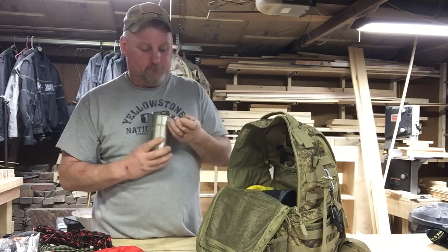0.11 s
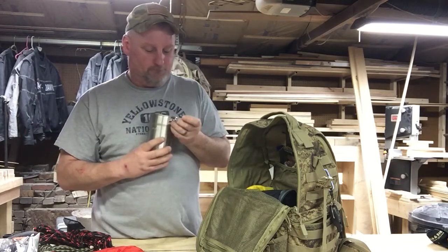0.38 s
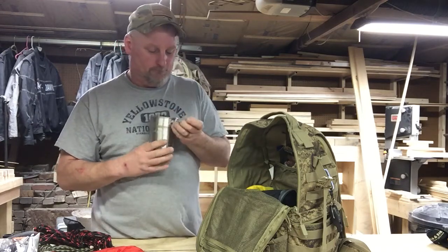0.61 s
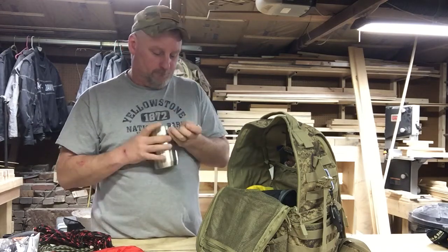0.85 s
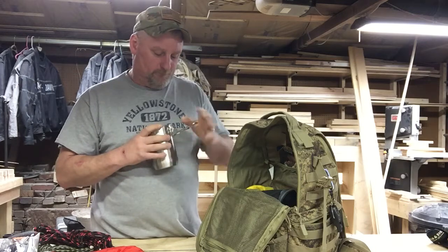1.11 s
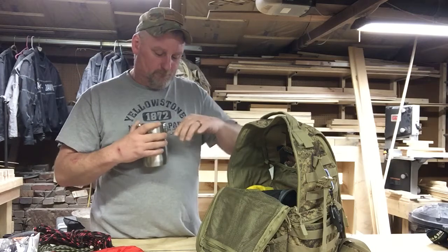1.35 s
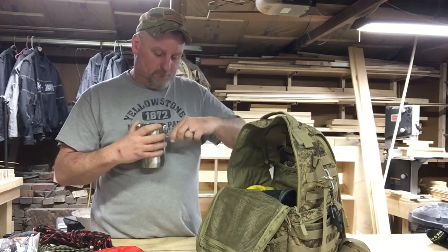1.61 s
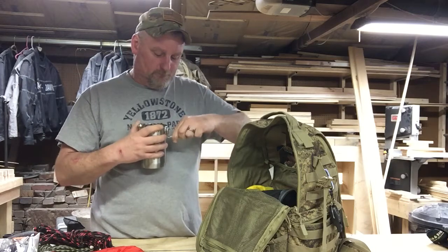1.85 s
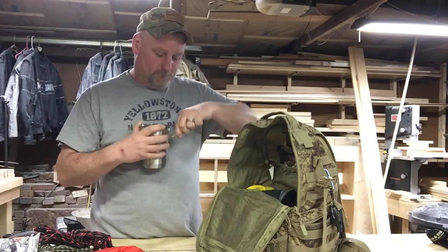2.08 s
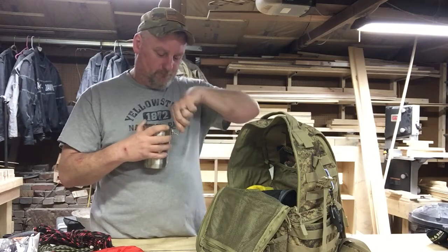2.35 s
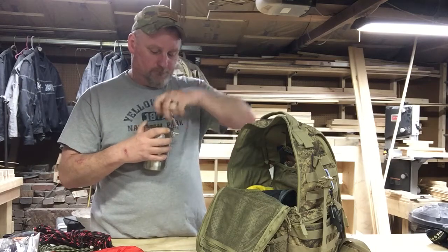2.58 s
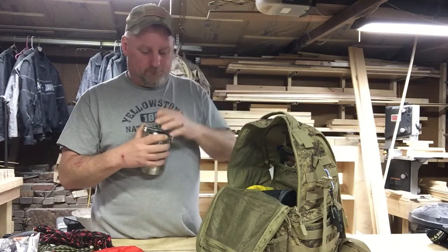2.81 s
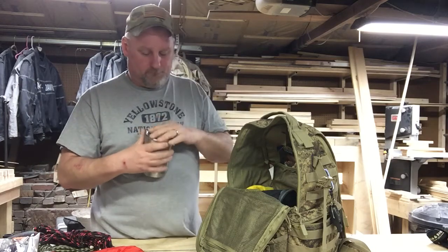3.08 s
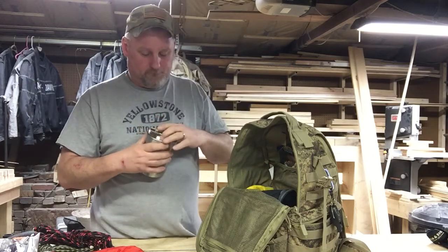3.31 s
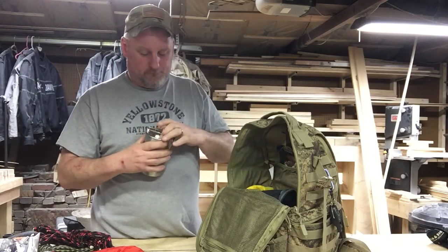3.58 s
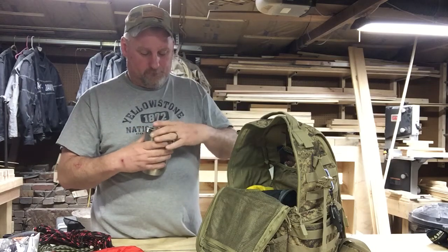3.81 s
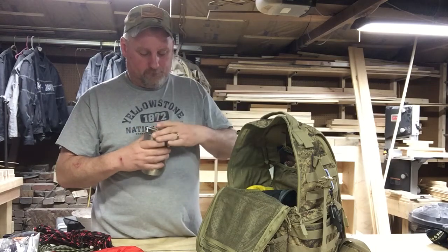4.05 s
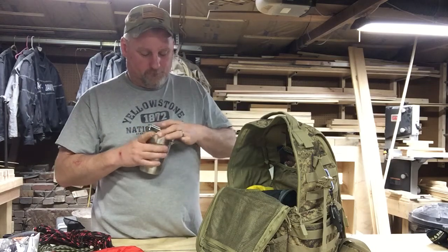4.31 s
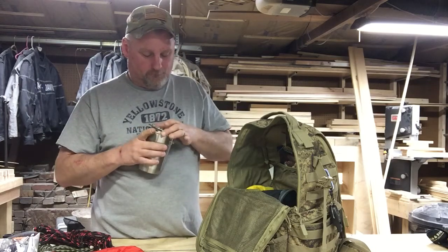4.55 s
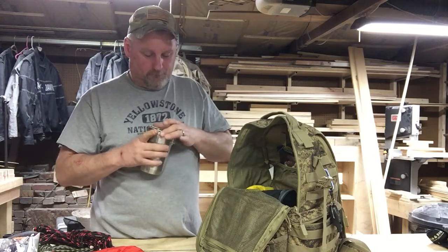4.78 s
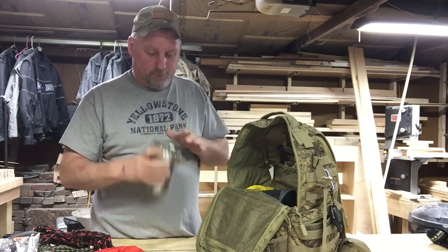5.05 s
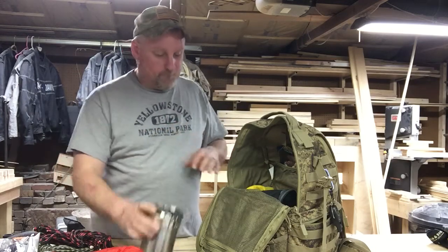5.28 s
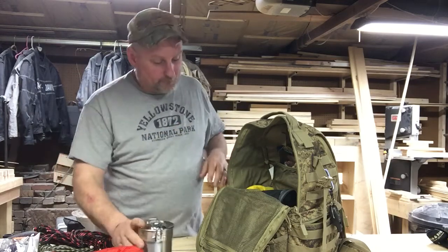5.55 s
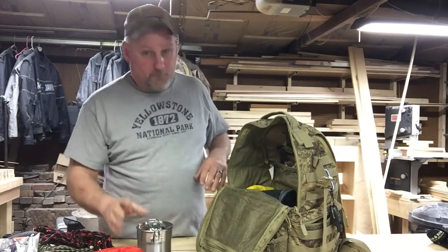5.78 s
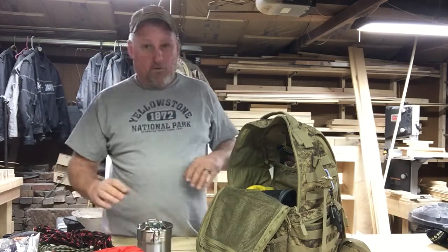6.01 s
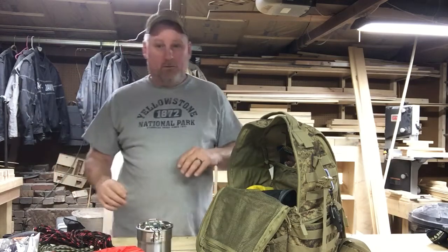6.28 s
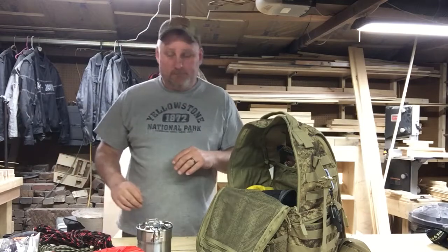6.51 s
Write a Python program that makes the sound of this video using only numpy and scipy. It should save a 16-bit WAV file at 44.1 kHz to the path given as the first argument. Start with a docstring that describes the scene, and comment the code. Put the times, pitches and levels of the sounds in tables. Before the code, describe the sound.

Thin steel cups click and scrape as they nest together, snap home loudly, then clank onto a wooden table over faint machine hum.

```python
"""A machine hums steadily nearby in a small workshop, in still room noise, and faint steel clicks begin.
Hands fit thin steel cups into one another: damped modes click, grainy noise scrapes, one snap drives out air.
The stack is then set on a wooden table, whose modes thud late in the bass; it rocks and bounces a few
times and rattles. Rubbed walls sing softly on single modes. Near echoes and a short tail place the hits
in the room. At the microphone the two hardest hits clip and deep bass is lost."""
import sys
import numpy as np
from scipy import signal
from scipy.fft import rfft, irfft
from scipy.io import wavfile
from scipy.ndimage import uniform_filter1d

SR = 44100
rng = np.random.default_rng(int(sys.argv[2]) if len(sys.argv) > 2 else 0)


def amplitude_ratio(level_db):
    """Convert a level in decibels to the matching linear amplitude (field) ratio."""
    exponent = np.asarray(level_db, float) / 20
    return 10 ** exponent


def to_wav(s):
    """Save 16-bit WAV."""
    ch = np.atleast_2d(s).T  # columns
    pcm = np.round(np.clip(ch, -1, 1) * 32767)  # PCM
    wavfile.write(sys.argv[1], SR, pcm.astype(np.int16))


N = 292790


def evened(x):
    """Scales to rms 1."""
    return x / np.sqrt(np.mean(x ** 2) + 1e-20)


def read(points, hz):
    """Reads a table along log frequency."""
    f, value = np.transpose(points)
    return np.interp(np.log(hz + 1), np.log(f + 1), value)


def add(mix, start_s, sound):
    """Mixes a sound in at start_s seconds."""
    part = mix[round(start_s * SR):][:len(sound)]
    part += sound[:len(part)]


def ring(modes, more_db=0, free=1, rise_s=0.00059, phase=0, seconds=.25):
    """Answer of a set of modes to one tap, peak 1; each swells over rise_s, and free scales its t60."""
    hz, db, t60 = np.transpose(modes)[:, :, None]
    t = np.arange(round(seconds * SR)) / SR
    swell = 1 - np.exp(-(t / rise_s) ** 2)
    decay = amplitude_ratio(db + more_db - 60 * t / np.maximum(free * t60, .003))
    x = (decay * swell * np.sin(2 * np.pi * hz * t + phase)).sum(0)
    return x / abs(x).max()


# wall modes too close to tell apart: (frequency [Hz], relative level [dB])
DENSE = [(300, -30), (700, -22), (1200, 2.5), (3500, 2), (7500, -4.5), (10000, -8.5), (11500, -5),
         (14000, -13), (16500, -8.5)]


def coloured(x, more_db=lambda hz: 0):
    """Gives noise the colour of the dense wall modes."""
    hz = np.fft.rfftfreq(len(x), 1 / SR) + 1
    return irfft(rfft(x) * amplitude_ratio(read(DENSE, hz) + more_db(hz)), len(x))


# wall of the hand-held stack: (frequency [Hz], relative level [dB], t60 before any further damping [s])
STEEL = [(840, -18, 0.012), (1064, -4, 0.021), (1280, 1, 0.018), (1473, -1, 0.031), (1790, -10, 0.036),
         (2130, -7, 0.03), (2800, -2, 0.017), (3140, 0.5, 0.023), (3580, -4, 0.027), (3870, -4.5, 0.013),
         (4426, -9.5, 0.047), (4510, -9, 0.011), (5230, -1.5, 0.0052), (5500, -7.5, 0.022),
         (6580, -7, 0.017), (7260, -11, 0.035), (8020, -11, 0.0074), (11400, -19.5, 0.025),
         (13700, -15, 0.015), (14400, -17.5, 0.038)]
# rim of an inner cup that no finger touches: (frequency [Hz], relative level [dB], t60 when free [s])
RIM = [(1650, -16.5, 0.07), (3155, 3.5, 0.036), (5840, -4, 0.064), (7530, -6.5, 0.062), (7825, -8, 0.028),
       (8900, -12, 0.03), (11270, -9.5, 0.05)]


def click(peak_db, best_hz, tilt_db, rim_db):
    """A contact rings wall and rim; modes near the place of contact sound louder."""
    grip_shift = .035  # each grip detunes the wall modes by about this share
    chatter = 3  # the contact's chatter dies away over this many rise times

    def tilt(hz):
        blunt = 0.51 * min(tilt_db, 0)  # blunt contacts lose the top faster
        return tilt_db * np.log2(hz / 3000) + blunt * np.maximum(np.log2(hz / 6500), 0)

    def place_db(hz):
        return tilt(hz) + 8 * np.exp(-(np.log2(hz / best_hz) / 0.2) ** 2)

    rise_s = 0.00039 * amplitude_ratio(-.36 * peak_db)  # gentle contacts are slower
    noise = rng.standard_normal(4096)
    chance = noise[:, None]  # the same draws also vary the grip and the phases
    t = np.arange(len(noise)) / SR
    wall = np.vstack([STEEL, [best_hz, -6, .022]])  # the spot that is touched adds its own note
    wall[:-1, :1] *= 1 + grip_shift * chance[100:100 + len(STEEL)]
    grip_db = np.vstack([3.5 * chance[:len(STEEL)], 0])
    phase = np.pi * chance[-len(wall):]
    steel = ring(wall, place_db(wall[:, :1]) + grip_db, 0.6, rise_s, phase)

    burst = evened(coloured(noise, place_db)) * amplitude_ratio(-60 * t / 0.025)
    steel[:len(t)] += 0.66 * burst * np.minimum(t / rise_s, 1)
    bounces = (abs(noise) > 2.5) * .6 * np.exp(-t / (chatter * rise_s))
    steel = signal.fftconvolve(steel, np.r_[1, bounces])[:len(steel)]
    steel /= abs(steel).max()
    steel = signal.lfilter(*signal.butter(2, 500, "high", fs=SR), steel)  # the clicks carry little below 500 Hz

    # a rim that is not quite round splits each mode
    pairs = np.vstack([RIM, np.multiply(RIM, [1.012, 1, .6]) - [0, 6., 0]])
    free = min(amplitude_ratio(.5 * (rim_db - 8.5)), 1)  # a rim that sounds freely also rings longer
    phase = np.pi * chance[-len(pairs):]
    steel += amplitude_ratio(rim_db) * ring(pairs, tilt(pairs[:, :1]), free, rise_s, phase)
    return steel * amplitude_ratio(peak_db) / abs(steel).max()


# steel against steel, before the room: (time [s], peak [dB], best-excited part of the wall [Hz],
# tilt [dB per octave], free rim relative to the wall [dB])
CLICKS = [(0.041, -53.5, 1330, -12, -16), (0.088, -53, 1110, 6, -11), (0.163, -42.5, 1070, 6.5, -4),
          (0.842, -34.5, 4380, -3.5, -25), (0.884, -50, 2380, -2, -12), (1.066, -45, 3040, 0, -20),
          (1.311, -24, 3230, -1.5, 1.5), (1.3454, -46, 1150, -3, -4), (1.3646, -42.5, 3080, -2.5, -20),
          (1.319, -36, 5840, 4, 6), (1.7856, -36, 2800, -4.5, -18), (1.7994, -48.5, 2170, -3, -11),
          (1.951, -49, 1145, -5.5, -5.5), (2.501, -41, 3820, -1, -24), (2.782, -43.5, 3330, -1.5, -14),
          (2.796, -36, 3000, -1.5, -12), (2.805, -3, 5444, 0.8, -20), (2.9522, -49, 1660, -9, -23),
          (3.1741, -31, 2840, 1.5, -10), (3.2848, -42.5, 3000, -1.5, -22), (3.7508, -45.5, 1310, -9, -3.5),
          (3.769, -49.5, 2195, -6, -9), (4.2944, -28, 1606, 4.5, -5.5), (4.3171, -30.5, 2980, 1.5, -9.5),
          (4.71, -32, 5200, 4, -30), (4.806, -33.5, 1350, 5, -15), (4.8766, -39, 4870, -2.5, -27),
          (4.995, -38.5, 3260, 2, -18), (5.0288, -39.5, 1870, -5.5, -8), (5.0624, -42.5, 1120, -4.5, -15),
          (5.1046, -45, 7360, 2.5, -8.5), (5.418, -3, 1050, -0.5, -12), (5.5583, -25.5, 1020, -9, -21),
          (5.6427, -32, 1090, -1, -10), (5.7596, -49, 2166, 2, -5), (6.1649, -45.5, 1740, -6, -19)]


def steel_clicks(mix):
    """Cups touch one another, each contact with its own grip and chatter."""
    for start_s, *contact in CLICKS:
        add(mix, start_s, click(*contact))


# air driven out as a cup snaps home:
# (time [s], peak [dB], modes as (frequency [Hz], relative level [dB], t60 [s]))
POP = (2.8048, -5.5, [(1330, 1.5, .014), (1554, -9.5, .07), (3490, -5, .03), (452, -22.5, .05)])


def air_pop(mix):
    """Air driven out as a cup snaps home rings a few modes."""
    start_s, peak_db, modes = POP
    add(mix, start_s, amplitude_ratio(peak_db) * ring(modes))


# air inside the cups: (frequency [Hz], relative level [dB], t60 [s])
HOLLOW = [(191, -3.5, 0.12), (279, -8.5, 0.0091), (332.1, 12, 0.034), (412, -1.5, 0.05)]
# a cup slides home or is jolted: (time [s], peak [dB])
THUMPS = [(0.6517, -45.5), (0.843, -35), (0.8839, -40), (1.7857, -49), (2.462, -49.5), (2.4944, -42.5),
          (2.804, -28.5), (3.751, -45.5), (4.994, -48), (5.0294, -41.5), (5.0631, -36.5), (5.1042, -45.5),
          (5.404, -34.5), (5.418, -8.5), (5.5579, -19.5), (5.76, -42), (5.774, -40)]


def air_thumps(mix):
    """A sliding or jolted cup thumps the air inside the stack, which swells gently."""
    for start_s, peak_db in THUMPS:
        add(mix, start_s, amplitude_ratio(peak_db) * ring(HOLLOW, rise_s=0.0083, seconds=.2))


# table top: (frequency [Hz], relative level [dB], t60 before further damping [s])
WOOD = [(63.5, -14.5, .1), (128, -8.5, 0.041), (172.2, 1.5, 0.061), (202, -4.5, 0.076), (295.4, 0, 0.055),
        (336, -1.5, 0.06), (380, 0.5, 0.022), (485, -1, 0.038), (610, -2, 0.033), (637, -3, 0.029),
        (754, -8, 0.028), (1010, -4, 0.029), (1054, -1, 0.037), (1205, -6.5, 0.033), (1350, -5.5, 0.022),
        (1521, -11, 0.016), (1659, -9.5, 0.024), (1990, -8, 0.016), (2335, -10, 0.016)]


def blow(level_db, contact_ms):
    """A push rings the table; longer contact is duller, and slow bending waves make the bass arrive late."""
    hz = np.array(WOOD)[:, :1]
    level_luck, phase_a, shift, phase_b = rng.standard_normal((4, len(WOOD), 1))
    soft_db = -10 * np.log10(1 + (hz * contact_ms / 1000) ** 4)
    late_s = 0.0026 * (500 / hz) ** 1.04  # 2.6 ms of travel across the table top at 500 Hz
    clear = ring(WOOD, soft_db + 0.61 * level_luck, 0.82, late_s, np.pi * phase_a, .35)
    # each spot wakes further, more damped modes
    between = WOOD * np.hstack([1 + .1 * shift, hz ** 0, hz ** 0])
    further = ring(between, soft_db, .5, late_s, np.pi * phase_b, .35)
    return amplitude_ratio(level_db) * (clear + .5 * further)


# the stack lands, rocks and bounces on the table:
# (time [s], peak of the clear modes [dB], contact time [ms])
BLOWS = [(5.418, 2.5, 0.14), (5.461, -18, 0.28), (5.558, -15.5, 0.62), (5.642, -13, 0.81),
         (5.688, -24, 2.3)]


def table_blows(mix):
    """The landing, rocking and bouncing stack pushes on the wooden top."""
    for start_s, *push in BLOWS:
        add(mix, start_s, blow(*push))


def scrape(loudest_s, level_db, swell_s, fade_s, lean_db):
    """Dense uneven grains excite the gripped wall, its clear modes and its dense ones."""
    swell_s, fade_s = max(swell_s, .003), max(fade_s, .01)
    t = np.arange(-swell_s, 2 * fade_s, 1 / SR)
    noise, size = rng.standard_normal((2, SR))[:, :len(t)]
    clumps = evened(uniform_filter1d(size, 200))  # grains come in clumps
    grains = noise * amplitude_ratio(3.0 * size + 3.5 * clumps)
    wall = ring(STEEL, phase=2 * np.pi * rng.random((len(STEEL), 1)), seconds=.1)
    clear = evened(signal.fftconvolve(grains, wall)[:len(t)])
    rubbed = 0.65 * clear + evened(coloured(grains))
    dull = signal.lfilter(*signal.butter(4, 7900, "low", fs=SR), rubbed)
    bright = signal.lfilter(*signal.butter(4, 7900, "high", fs=SR), rubbed)
    x = evened(dull / amplitude_ratio(lean_db) + bright * amplitude_ratio(lean_db))  # light fast sliding is brighter
    # a stroke rises by 20 dB over its swell and dies away by 20 dB in every fade time
    stroke_db = level_db - 20 * np.maximum(-t / swell_s, t / fade_s)
    return loudest_s + t[0], amplitude_ratio(stroke_db) * x * signal.windows.tukey(len(t), .1)


# walls slide and rattle: (loudest time [s], level [dB], swell, at least 0.003 [s], fade, at least 0.01 [s],
# treble lift and equal cut below it, before levelling [dB])
SCRAPES = [(0.654, -68, 0.037, 0.27, 6), (.815, -53.5, 0.08, 0.074, 12), (0.848, -48.5, 0.01, 0.058, -20),
           (2.504, -47.5, 0.036, 0.015, -2), (1.311, -59.5, 0.034, 0.065, 1),
           (4.717, -68.5, .008, 0.099, -13), (4.883, -55, 0.015, 0.031, -13),
           (2.816, -31, 0.0046, 0.084, 1.5), (3.026, -63.5, 0.055, 0.034, -3),
           (3.101, -65.5, 0.025, 0.14, 5), (3.19, -58, 0.0071, 0.042, -15.5), (3.734, -68, 0.088, 0.047, 1),
           (3.755, -67.5, 0.022, 0.053, -5.5), (4.333, -54, 0.01, 0.036, 7),
           (4.968, -57, 0.029, 0.0085, -23), (4.997, -50, 0.017, 0.014, -7), (5.059, -62, 0.2, 0.13, -4),
           (5.416, -48, 0.021, 0.026, -19), (5.432, -28, 0.0069, 0.072, -1),
           (5.567, -42, .012, 0.091, -0.5), (5.675, -39, .04, 0.077, 1), (5.77, -57, 0.025, 0.054, 0),
           (6.155, -66, .25, 0.12, -20)]


def wall_scrapes(mix):
    """Sliding and rattling walls give one grainy stroke after another."""
    for row in SCRAPES:
        add(mix, *scrape(*row))


def sing(length_s, level_db, hz):
    """Friction noise heard through one narrow wall mode, which also rings on by itself."""
    t = np.arange(0, length_s, 1 / SR)
    pole = np.exp(-np.pi * 70 / SR)  # the mode is 70 Hz wide
    drift = signal.lfilter([1], [1, -pole], rng.standard_normal((2, SR // 2)))[:, -len(t):]
    steady = np.sin(2 * np.pi * hz * t)
    wavering = evened(drift[0] * steady + drift[1] * np.cos(2 * np.pi * hz * t))
    return amplitude_ratio(level_db) * evened(wavering + steady) * signal.windows.tukey(len(t), .6)


# a rubbed or rocking wall sings on one mode:
# (start time [s], length [s], level before the soft ends [dB rms], frequency [Hz])
SINGING = [(2.452, .03, -65, 2900), (2.482, 0.018, -62, 5200), (2.49, .05, -68, 6900),
           (.843, 0.023, -54, 1143), (2.997, .05, -63, 2140), (3.755, 0.029, -55.5, 2285),
           (4.15, .42, -67, 1440), (4.941, 0.042, -57, 3320), (4.938, 0.048, -61, 2170),
           (4.939, 0.042, -60.5, 1394), (4.811, 0.039, -63.5, 1444), (5.427, 0.091, -48, 3870),
           (5.436, .09, -52, 2260), (5.68, .16, -58.5, 1005), (5.75, 0.089, -61.5, 1790),
           (5.757, 0.032, -54.5, 2220), (6.151, .04, -61, 1703)]


def wall_singing(mix):
    """Friction keeps single wall modes sounding softly."""
    for start_s, *note in SINGING:
        add(mix, start_s, sing(*note))


# decay of the workshop: (frequency [Hz], t60 [s])
ROOM = [(150, 0.2), (600, 0.16), (2000, 0.13), (5000, 0.2), (8000, 0.19), (11000, 0.045), (15000, 0.078)]
# near echoes: (delay [s], level [dB])
ECHOES = [(.0035, -13), (.0075, -14), (.013, -17.5), (.021, -20.5)]


def room(x):
    """Near echoes, then sparse taps dying band by band; two random tails take turns, so neither colours all."""
    taps, near = np.zeros((2, SR // 2)), np.zeros(SR // 20)
    at = np.arange(200, SR // 2 - 20, 20)
    at = at + rng.integers(0, 20, (2, len(at)))
    np.put_along_axis(taps, at, rng.choice([-1., 1.], at.shape), 1)
    hz, t, z = signal.stft(taps, SR, nperseg=256)
    decay = amplitude_ratio(-60 * t / read(ROOM, hz)[:, None])
    tails = signal.istft(z * decay, SR, nperseg=256)[1]
    tails *= amplitude_ratio(-10.5) / np.linalg.norm(tails[0])
    for delay_s, db in ECHOES:
        near[round(delay_s * SR)] = amplitude_ratio(db)
    turn = 2 * np.pi * 7 * np.arange(N) / SR  # 7 Hz
    wet = signal.oaconvolve(x * [np.cos(turn), np.sin(turn)], tails, axes=1).sum(0)
    return x + signal.oaconvolve(x, near)[:N] + wet[:N]


# lines of the machine: (frequency [Hz], level [dB rms])
HUM = [(91.5, -79.5), (188.4, -60.5), (285.3, -74.5), (376.8, -76.5), (473.7, -75), (855.9, -76),
       (1055, -80.5)]


def machine_hum():
    """A steady hum whose lines are part steady, part wavering like narrow noise."""
    hz, t = np.fft.rfftfreq(N, 1 / SR), np.arange(N) / SR
    a, b = rng.standard_normal((2, len(hz)))
    out = np.zeros(N)
    for f, db in HUM:
        line = 1 / (1 + ((hz - f) / 8) ** 2)  # half amplitude 8 Hz off the line
        waver = evened(irfft((a + 1j * b) * line, N))
        out += amplitude_ratio(db) * evened(waver + 2.5 * np.sin(2 * np.pi * f * t))
    return out


# colour of the room noise: (frequency [Hz], relative level [dB per Hz])
AIR = [(20, -30.5), (45, -14), (65, -7.5), (135, -12.5), (189, -9.5), (236, -14), (464, -17.5), (706, -21),
       (900, -20.5), (1550, -22.5), (4000, -29), (8000, -36), (10500, -41.5), (12000, -40.5),
       (16400, -44.5)]


def still_air():
    """Still room noise: random phases and levels under a fixed spectrum, -63 dB rms."""
    hz = np.fft.rfftfreq(N, 1 / SR)
    a, b = rng.standard_normal((2, len(hz)))
    return amplitude_ratio(-63) * evened(irfft((a + 1j * b) * amplitude_ratio(read(AIR, hz)), N))


def scene():
    """Cups and table in the room, over the hum; the soft rubs are heard without echo."""
    hits, rubs = np.zeros((2, N))
    steel_clicks(hits)
    air_pop(hits)
    air_thumps(hits)
    table_blows(hits)
    wall_scrapes(rubs)
    wall_singing(rubs)
    return (room(hits) + rubs + still_air() + machine_hum())[None]


def band_limit(x):
    """A steep low-pass at the top of the band."""
    return signal.sosfilt(signal.butter(12, 16520, fs=SR, output="sos"), x)


def record(dry):
    """At the microphone the two hardest hits clip and deep bass is lost."""
    clipped = np.clip(dry, -.93, .93)
    mix = signal.lfilter(*signal.butter(2, 45, "high", fs=SR), clipped)
    return band_limit(mix)


dry = scene()
out = record(dry)
to_wav(out)
```